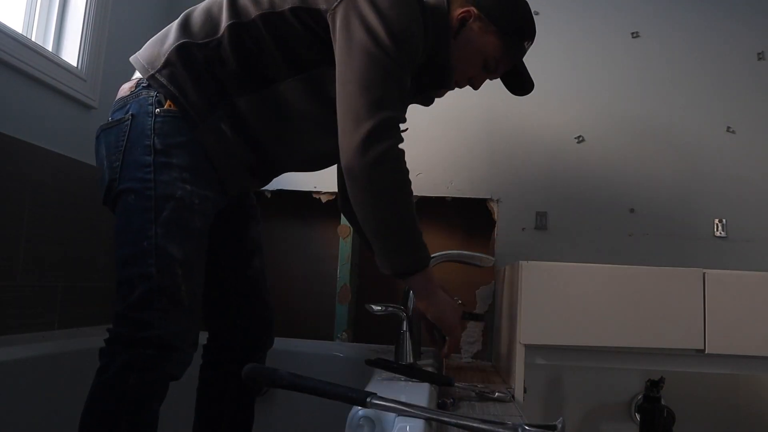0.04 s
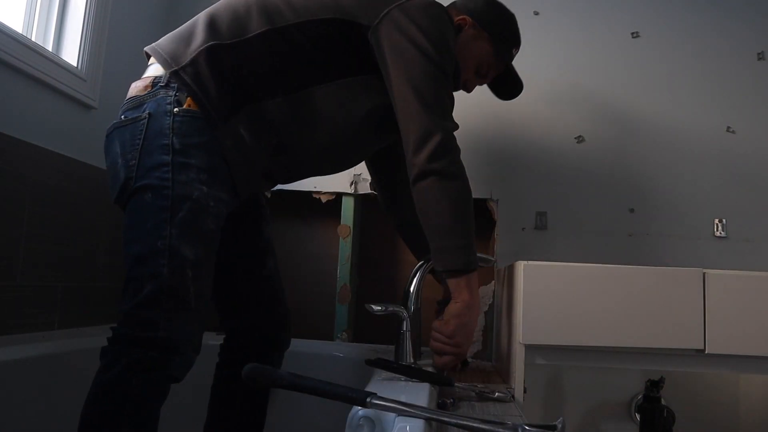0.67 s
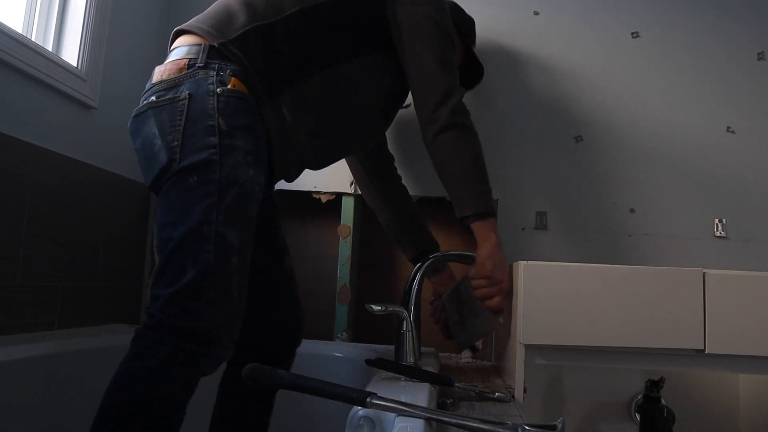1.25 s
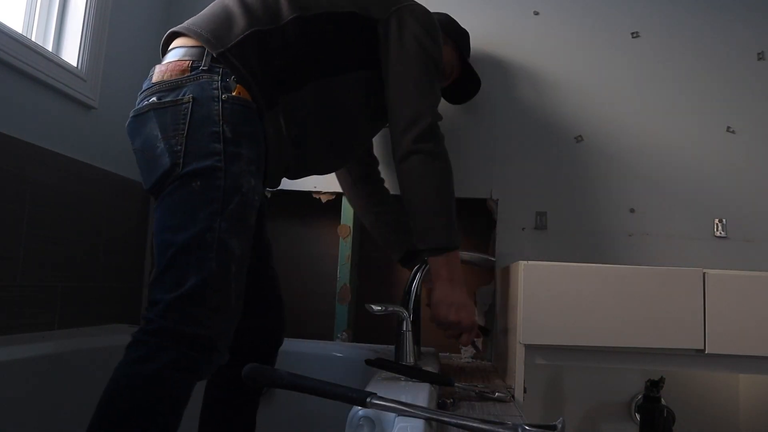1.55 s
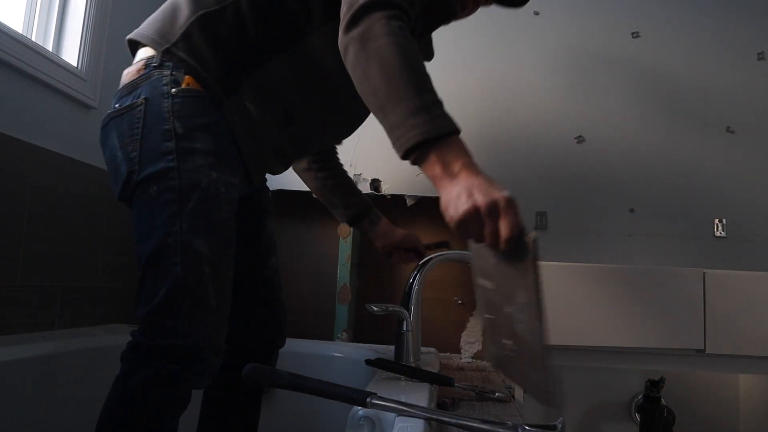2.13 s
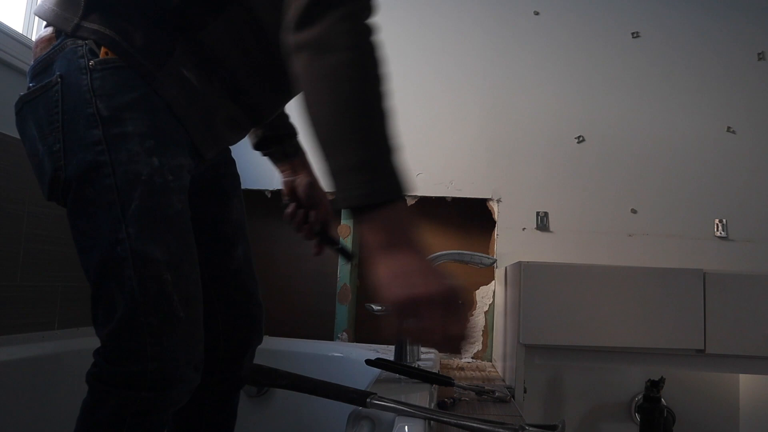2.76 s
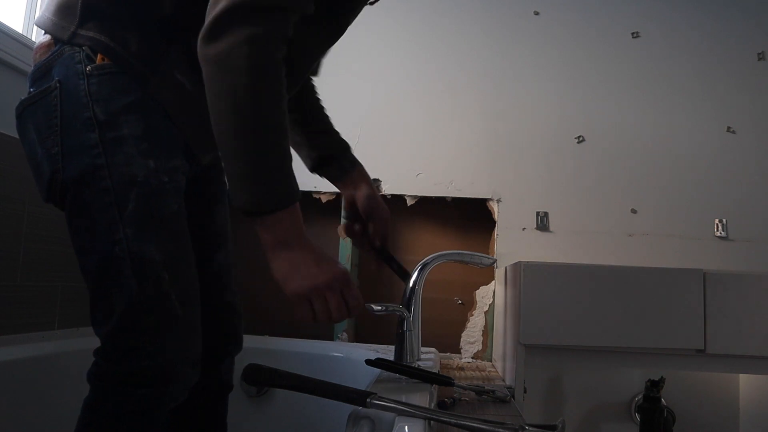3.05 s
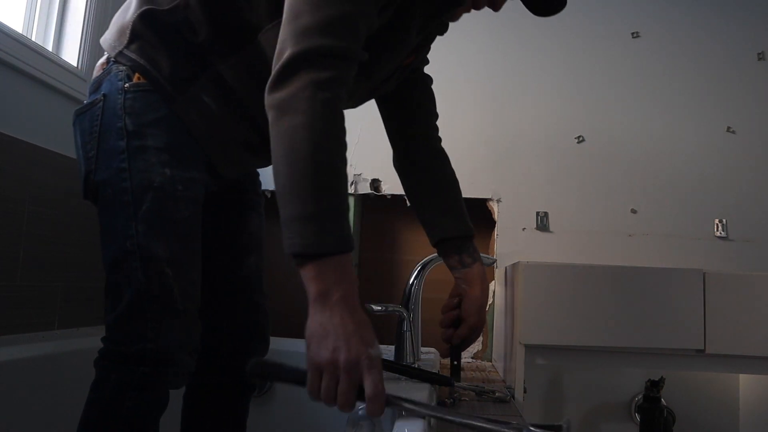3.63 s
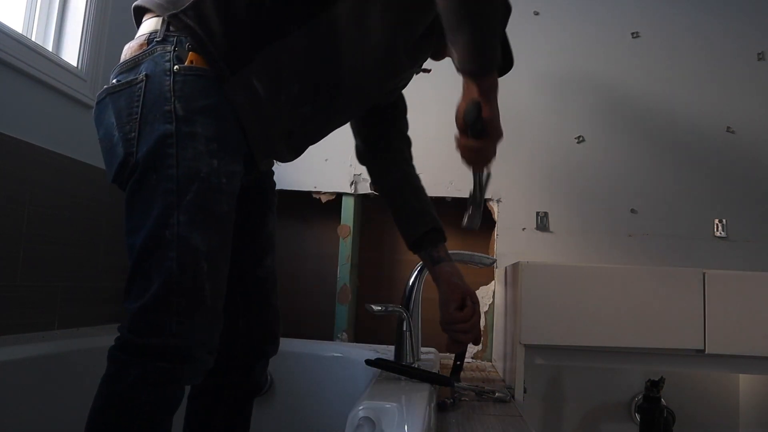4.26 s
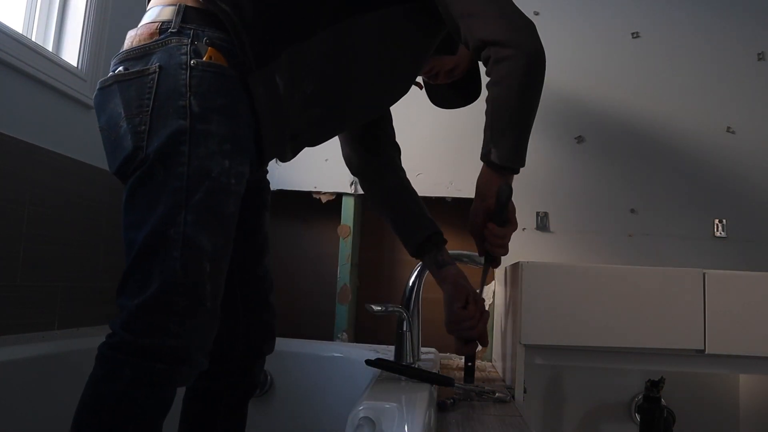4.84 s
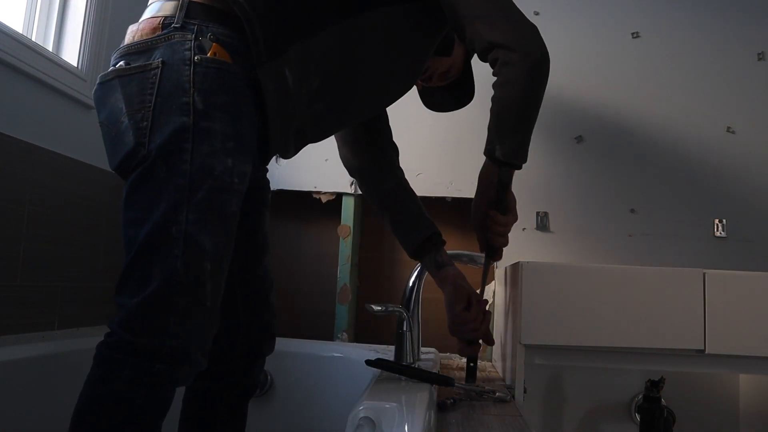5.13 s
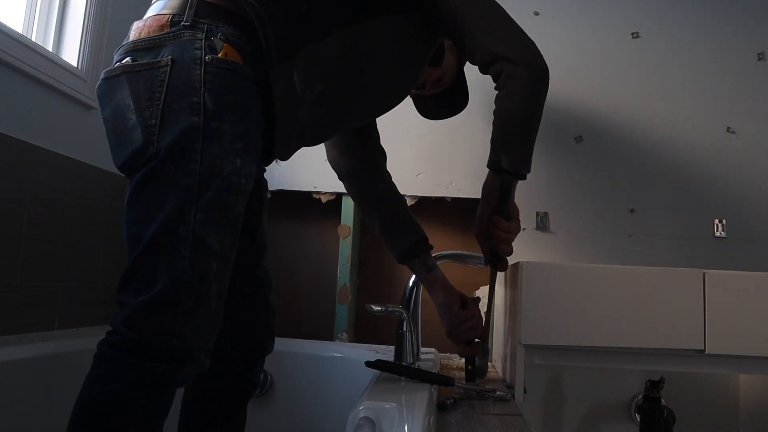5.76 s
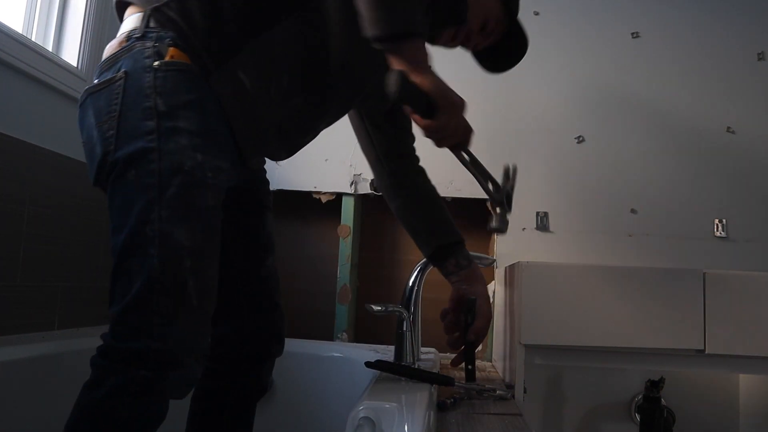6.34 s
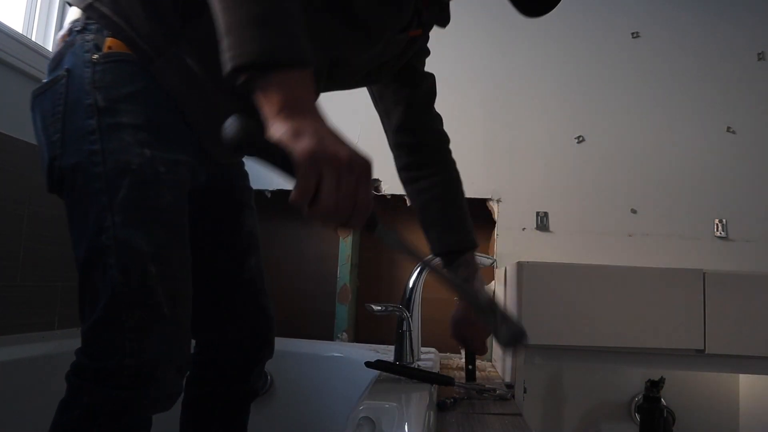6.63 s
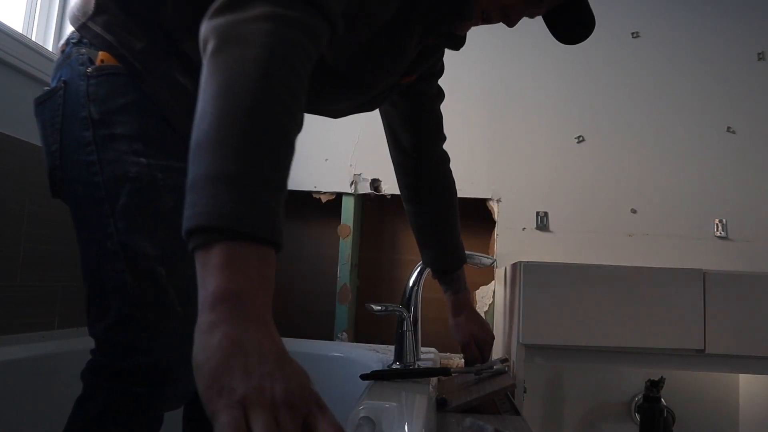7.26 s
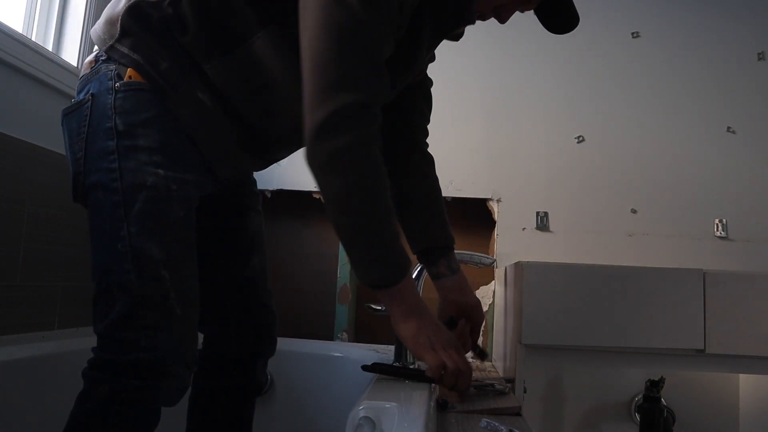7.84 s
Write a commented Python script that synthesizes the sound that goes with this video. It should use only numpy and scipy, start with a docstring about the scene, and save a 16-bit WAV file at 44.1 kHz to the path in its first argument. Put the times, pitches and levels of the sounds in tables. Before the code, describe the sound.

A steel bar works at wall tile close by in a bare, ringing bathroom, over faint room air and soft rustling. It starts with light metal tinks and a short scrape. From about 0.6 to 1.6 seconds the bar grinds and chips through mortar, with falling crumbs, hollow knocks and a low rumble from wall and tub. At 2 seconds a tile snaps free with a loud thump and a few dry knocks. From 2.8 to 3.3 seconds it clatters and rings on the floor. Near 4.5 seconds a hammer hits the tub ledge with a ringing double knock, then dull bumps. It strikes the bar three times, sharp and metallic, at about 5.1, 5.4 and 5.8 seconds. Around 7 seconds more mortar scrapes and breaks and shards clack. From 7.4 seconds tools clink on the tub rim, the last ringing a clear note.

```python
"""A bare, ringing bathroom: tile is pried off the hollow wall beside the tub.
A steel bar grinds and chips through mortar until a tile snaps free. Tossed aside, the tile clatters
on the floor. A hammer knocks the ledge and drives the bar three times; more mortar breaks, then tools
rattle on the tub rim. Contacts are clicks and grit that shake the wall; struck objects ring in
decaying modes. Room air, soft swells of noise and a deep sway of tub and wall lie underneath."""
import sys
import numpy as np
from scipy import signal
from scipy.fft import rfft, irfft
from scipy.io import wavfile
from scipy.ndimage import uniform_filter1d

SR = 44100
rng = np.random.default_rng(int(sys.argv[2]) if len(sys.argv) > 2 else 0)


def to_wav(sig):
    """Store sig (one row per channel, or 1-D mono) as 16-bit WAV at the path in sys.argv[1].

    Samples outside -1..1 are clipped; the rate is SR.
    """
    pcm = np.clip(np.atleast_2d(sig), -1, 1) * 32767
    pcm = np.round(pcm).astype(np.int16)
    wavfile.write(sys.argv[1], SR, pcm.T)  # frames by channels


N = 357210
SPAN = SR // 4   # samples per contact

# Room air spectrum. Each row: frequency in Hz, relative density in dB.
AIR_SPECTRUM = [(30, -11), (100, 4), (250, -4), (600, -15.5), (1500, -12.5), (4000, -29.5), (9000, -40),
                (12000, -29.5), (15000, -61.5)]
# Soft swells of noise. Each row: midpoint in seconds, length in seconds, level in dB.
SWELLS = [(0.175, 1, -40.5), (1.09, 0.76, -34.5), (1.631, 0.63, -43.5), (2.507, 0.44, -49),
          (2.76, 0.2, -46), (3.265, 1, -52.5), (3.792, 0.032, -33), (4.13, 0.064, -63),
          (4.303, 0.03, -58.5), (4.75, 0.17, -43), (6.68, 0.96, -66), (6.858, 0.026, -71)]
# Spectrum of the swells. Each row: frequency in Hz, relative density in dB.
SWELL_SPECTRUM = [(300, 3), (1000, 3.5), (3000, -1), (7000, -11.5), (12000, -13), (14000, -27),
                  (15500, -30)]
# Weight shifts. Each row: start in seconds, level in dB.
WEIGHT_SHIFTS = [(.9, -52), (1.18, -31), (1.45, -22), (2.828, -64), (4.45, -52)]
# Hollow stud wall and tub. Each row: frequency in Hz, level in dB, T60 in seconds.
HOLLOW_WALL_MODES = [(72, -11, .09), (88, -3, .08), (106, -1, .065), (135, -1, .09), (172, -3, .04),
                     (219, 3, .075), (252, 1, .06), (315, -1, .035), (400, -1, .04), (480, -3, .025),
                     (700, -7, .015)]
# Grazes on the loosely held bar. Each row: start in seconds, ring in dB, clack in dB.
BAR_TINKS = [(.001, -40, -35), (.313, -38, -32), (2.467, -50, -58), (2.545, -53.5, -53.5)]
# Free bar. Each row: frequency in Hz, level in dB, T60 in seconds.
LOOSE_BAR_MODES = [(1480, -2, .6), (1513, -1, .4), (2912, -9, .35), (3661, -8, .3), (3685, -10, .15),
                   (4710, -20, .35), (7063, -14, .38), (8570, -15, .32), (10700, -9, .18)]
# Crumbs of glaze and mortar. Each row: start in seconds, level in dB, band centre in Hz.
CRUMB_FALLS = [(.052, -53.5, 11900), (.183, -47, 10500), (1.186, -45, 10500), (1.207, -41, 11000),
               (1.264, -49, 9000), (3.14, -55, 12500), (3.231, -49, 12000), (3.564, -55, 4850),
               (4.756, -50.5, 4840)]
# Bar strokes through mortar. Each row: start and length in seconds, then thump, clack and crack in dB.
GRIND_STROKES = [(0.111, .11, -29.5, -28.5, -50), (0.889, 0.072, -27.5, -32, -41),
                 (0.919, 0.036, -17.5, -22.5, -60), (1.135, 0.11, -22, -23.5, -35.5),
                 (1.225, 0.098, -26, -28, -38), (6.928, 0.041, -49, -34, -44.5),
                 (6.99, 0.11, -35.5, -23.5, -51), (7.344, 0.062, -40.5, -38.5, -71)]
# Mortar chipping off. Each row: start in seconds, then thump, clack and crack in dB.
MORTAR_CHIPS = [(.168, -31, -50, -39), (0.642, -45, -45.5, -40), (0.977, -35, -37, -36.5),
                (1.131, -39.5, -37.5, -33.5), (2.073, -30, -30, -42), (2.086, -29, -29.5, -40.5),
                (3.795, -41, -47, -47), (6.035, -43.5, -38, -44.5), (6.576, -40.5, -53, -55),
                (7.105, -30, -29, -39.5)]
# Bar wedged behind a tile. Each row: frequency in Hz, level in dB, T60 in seconds.
WEDGED_BAR_MODES = [(1550, -2, .03), (1950, 0, .03), (2500, -1, .025), (2850, 1, .03), (3849, -4, .03),
                    (3960, 0, .02), (4110, 1, .02), (5184, -9, .03), (6406, -15, .04), (8000, -8, .03),
                    (8199, -10, .04), (10940, -16, .04), (12350, -13, .04)]
# Dull knocks on wall and tub. Each row: start in seconds, thump in dB, thump tilt in dB per octave,
# clack in dB, crumble time in seconds.
WALL_KNOCKS = [(.56, -42.5, 4, -52, .01), (0.778, -35, 3, -43, 0.01), (1.472, -25.5, -6, -59, 0.0036),
               (1.539, -44.5, 5, -18.5, 0.0023), (1.572, -30.5, 2, -29, 0.0025),
               (1.992, -24, 3, -26.5, 0.012), (2.155, -35, -1, -43, .01), (2.215, -34, -7.5, -42.5, .012),
               (2.29, -44.5, -7, -49, .01), (2.667, -46, -9, -64.5, .01), (2.74, -46.5, -6, -51.5, .01),
               (3.12, -24, 4, -39, .01), (4.59, -26, 5, -33.5, 0.014), (4.62, -31, 7.5, -35.5, 0.01),
               (6.419, -51.5, -4, -75, 0.016), (6.539, -44, 0, -77, 0.02), (6.895, -46.5, -0.5, -72, .02)]
# Bar edge on glaze. Each row: start in seconds, length in seconds, band centre in Hz, level in dB.
GLAZE_SQUEAKS = [(1.256, 0.02, 2780, -33.5), (4.754, .022, 4070, -55), (6.03, 0.024, 1960, -42.5),
                 (6.926, 0.03, 1950, -42.5)]
# Freed tile and backing against the wall. Each row: start in seconds, level in dB.
SLAB_KNOCKS = [(1.958, -24), (1.992, -22), (2.052, -30.5), (2.085, -31)]
# Hand-held tile backed with mortar. Each row: frequency in Hz, level in dB, T60 in seconds.
HELD_SLAB_MODES = [(273, -2.5, .07), (326, -1, .06), (379, 1, .08), (425, 2, 0.056), (484, -2, .05),
                   (558, -3, .04)]
# Tossed tile bouncing. Each row: start in seconds, clack in dB, crack in dB, crumble time in seconds.
TILE_BOUNCES = [(2.8445, -22, -32.5, 0.0054), (2.8559, -17, -22, 0.001), (2.87, -33.5, -33.5, 0.015),
                (2.978, -21, -44, 0.011), (3.022, -25, -51.5, 0.013), (3.079, -20, -44, 0.05),
                (3.116, -22, -29.5, 0.0059), (3.15, -22, -50.5, 0.007), (3.19, -28.5, -60, .008),
                (3.235, -26.5, -51, 0.017)]
# Whole tile, free. Each row: frequency in Hz, level in dB, T60 in seconds.
FREE_TILE_MODES = [(1110, -4, .12), (1254, -8, .15), (1390, -2, .18), (1523, 6, .55), (1537, 1, .35),
                   (1564, 4, .38), (1650, -5, .15), (1841, -10, .15), (1985, -6, .15), (2153, -4, .33),
                   (2191, -7, .5), (2720, -9, .15), (2853, -9, .2), (2923, -8, .35), (2960, -3, .2),
                   (3040, -7, .15), (3521, -15, .45), (3610, -14, .15), (5410, -25, .3), (7154, -28, .45)]
# Shards and tools on the ledge. Each row: start in seconds, clack in dB.
SHARD_CLACKS = [(3.739, -34.5), (3.8626, -35), (6.9554, -21), (7.386, -22.5), (7.5473, -28), (7.761, -31.5),
                (8.03, -43)]
# Shard damped by mortar. Each row: frequency in Hz, level in dB, T60 in seconds.
DAMPED_SHARD_MODES = [(540, -1.5, 0.017), (1155, 7, 0.0067), (1700, 7.5, 0.007), (2040, 2.5, 0.02),
                      (2600, -7.5, 0.017), (4500, -2.5, 0.0059)]
# Hammer knocking the ledge and dropping back. Each row: start in seconds, then thud, clack and ring
# in dB, ring tilt in dB per octave.
LEDGE_HITS = [(4.4452, -18.5, -25, -21.5, -1), (4.482, -20.5, -29, -21.5, -0.5)]
# Tub ledge. Each row: frequency in Hz, level in dB, T60 in seconds.
TUB_LEDGE_MODES = [(131.2, -2, .2), (169, -3, 0.049), (228.8, -0.5, 0.122), (264, -1, 0.15),
                   (336, -4.5, 0.064), (402, -5, 0.11), (495, -3, .07), (598, -7.5, 0.032)]
# Hammer against the ledge. Each row: frequency in Hz, level in dB, T60 in seconds.
HAMMER_HEAD_MODES = [(1480, 1, .06), (1615, 5, .2), (1647, 3, .4), (1690, 2, .12), (1745, 0, .1),
                     (1950, 3, .07), (2150, 3, .04), (2450, 3, .04), (2713, -4, .22), (3106, 2, .07),
                     (3365, -2, .08), (3720, -14, .55), (3745, -6, .15), (5222, -19, .3), (6056, -12, .31),
                     (6503, -9, .16), (7020, -18, .15), (7585, -24, .3), (7768, -21, .22), (7876, -19, .25),
                     (8048, -25, .3)]
# Hammer driving the bar. Each row: start in seconds, clack in dB, zing in dB, zing tilt in dB per
# octave, crack in dB, ring in dB, ring tilt in dB per octave.
BAR_BLOWS = [(5.0831, -37, -20.5, 1, -23.5, -40.5, 10), (5.4242, -34, -15, -1, -25, -26.5, 4.5),
             (5.7520, -34.5, -23.5, 19, -22, -24.5, -1)]
# Bar struck end-on, damped by hand and mortar. Each row: frequency in Hz, level in dB, T60 in seconds.
DRIVEN_BAR_MODES = [(2110, 2, .025), (2200, 0, .02), (2500, 0, .01), (2864, 1, .025), (2990, 3, .02),
                    (3120, 2, .015), (3500, 1, .008), (3908, -2, .02), (4200, 0, .012), (4600, 0, .012),
                    (5200, -2, .01), (5650, -3, .035), (7731, -7, .12), (7870, -6, .05), (8037, -8, .06),
                    (8285, -12, .1), (10430, -8, .03), (11100, -5, .04), (11800, -10, .05)]
# Steel on steel. Each row: frequency in Hz, level in dB, T60 in seconds.
STEEL_ZING_MODES = [(4240, -4.5, 0.003), (5710, -9, 0.0058), (7540, 0, 0.0084), (8020, 3, 0.0062),
                    (10000, -1, 0.0032), (11000, -6.5, 0.0065), (11540, -8, .008)]
# Tools laid on the tub rim and nudged. Each row: start in seconds, then clack, thump and ring in dB.
RIM_CLINKS = [(7.445, -29, -22.5, -31.5), (7.794, -30, -29.5, -34.5)]
# Steel hammer shaft. Each row: frequency in Hz, level in dB, T60 in seconds.
HAMMER_SHAFT_MODES = [(4285, -8, .3), (4450, -3, .06), (4760, 1, .05), (4850, -1, .08), (6000, -5, .07),
                      (6300, -4, .07), (7058, -9, .25), (7130, -4, .08), (7700, -7, .08), (8113, -10, .16),
                      (8786, -9, .19), (9652, -11, .15), (11100, -9, .08)]
# Steel tool swinging free. Each row: frequency in Hz, level in dB, T60 in seconds.
LOOSE_TOOL_MODES = [(1701, -9, .5), (2756, 8, .6), (2778, -4, .35), (2810, -5, .15), (3391, -7, .3),
                    (4834, -19, .4), (5889, -15, .2), (7095, -22, .4), (8710, -18, .2)]
# Room decay. Each row: frequency in Hz, T60 in seconds.
ROOM_DECAY = [(60, 1), (150, 0.38), (300, 0.55), (600, 0.92), (1500, 0.82), (3000, 0.63), (5000, 0.81),
              (8000, 0.25), (14000, 0.44)]
# Diffuse field width. Each row: frequency in Hz, side minus mid in dB.
STEREO_WIDTH = [(60, -41.5), (125, -26), (250, -19.5), (500, -11), (1000, -2.5), (2000, 2), (4000, 4.5),
                (12000, 9.5)]


def from_db(db):
    """Decibels to gain."""
    return 10 ** (np.asarray(db) / 20)


def at_hz(points, hz):
    """Table lookup on a log-frequency axis."""
    points_hz, values = np.transpose(points)
    return np.interp(np.log(hz + 1), np.log(points_hz), values)


def unit(x):
    """Scale to the energy of 0.1 s at rms 1."""
    return x * np.sqrt(SR / 10 / (np.sum(x ** 2) + 1e-20))


def cut(x, hz, kind, order=2):
    """Butterworth filter."""
    sos = signal.butter(order, np.clip(hz, 10, .48 * SR), kind, fs=SR, output="sos")
    return signal.sosfilt(sos, x + 1e-18)


def add(track, start_s, x):
    """Mix x into the track."""
    i = max(0, round(start_s * SR))
    track[..., i:i + x.shape[-1]] += x[..., :N - i]


def tilted(modes, db_per_oct):
    """The strike point favours high or low modes."""
    return [(hz, db + db_per_oct * np.log2(hz / modes[0][0]), t60_s) for hz, db, t60_s in modes]


def detuned(modes, spread):
    """Pitches shift slightly with the contact point."""
    return [(hz * np.exp(spread * rng.standard_normal()), db, t60_s) for hz, db, t60_s in modes]


def ringing(modes, vary_db, size):
    """Decaying sines of alternating sign; their balance varies per touch."""
    t = np.arange(size) / SR
    hz, db, t60_s = np.transpose(modes)[:, :, None]
    gains = from_db(db + vary_db * rng.standard_normal(hz.shape))
    gains[1::2] *= -1
    decay = np.exp(-np.log(1000) * t / t60_s)
    return unit(np.sum(gains * decay * np.sin(2 * np.pi * hz * t), axis=0))


def diffuse(size):
    """Stereo noise from all sides: narrow bass, wide treble."""
    mid, side = rfft(rng.standard_normal((2, size)))
    width = from_db(at_hz(STEREO_WIDTH, np.arange(len(mid)) * SR / size))
    return irfft(np.array([mid + width * side, mid - width * side]) / np.sqrt(1 + width ** 2), size)


def coloured(spectrum):
    """Shaped diffuse noise, rms 1."""
    hz = np.arange(N // 2 + 1) * SR / N
    noise = irfft(rfft(diffuse(N)) * from_db(at_hz(spectrum, hz)), N)
    return noise / noise.std()


def room_air(level_db=-56):
    """Faint steady noise, mostly low."""
    return from_db(level_db) * coloured(AIR_SPECTRUM)


def noise_swells(rest_db=-64.5, flutter_db=2):
    """Soft swells of noise: room wash, cloth rustle and small scrapes."""
    t = np.arange(N) / SR
    flutter = cut(rng.standard_normal(N), 40, "low")
    swells = sum(from_db(db) * np.cos(np.pi * np.clip((t - middle_s) / length_s, -.5, .5))
                 for middle_s, length_s, db in SWELLS)
    level = (from_db(rest_db) + swells) * from_db(flutter_db * flutter / flutter.std())
    return level * coloured(SWELL_SPECTRUM)


def swaying(rest_db=-68.5, attack_s=.017, t60_s=.48):
    """Each weight shift sets tub and wall rumbling."""
    level = from_db(rest_db)
    for start_s, db in WEIGHT_SHIFTS:
        age_s = np.maximum(np.arange(N) / SR - start_s, 0)
        level = level + from_db(db - 60 * age_s / t60_s) * (1 - np.exp(-age_s / attack_s))
    rumble = cut(rng.standard_normal(N), [24, 52], "band")
    return level * rumble / rumble.std()


def grit(grains_per_s=2500, spread_db=2):
    """Mortar grains crack at random, a few much harder."""
    sizes = from_db(spread_db * np.minimum(rng.exponential(1, SPAN), 4)) * rng.standard_normal(SPAN)
    return sizes * (rng.random(SPAN) < grains_per_s / SR)


def tiled_wall(push, force, thump_db, clack_db, clack_hz, crack_db, crack_hz, wall_db_per_oct):
    """Push thumps the hollow wall; force clacks the damped tile and cracks its brittle edge."""
    modes = tilted(detuned(HOLLOW_WALL_MODES, spread=.051), wall_db_per_oct)
    thump = signal.fftconvolve(push, ringing(modes, vary_db=2.96, size=SPAN))[:SPAN]
    thump = cut(thump, 50, "high", order=3)
    clack = cut(force, clack_hz * .33, "high", order=1)
    clack = cut(clack, clack_hz * 1.632, "low", order=3)
    clack = cut(clack, 300, "high")
    crack = cut(force, [crack_hz * .35, crack_hz * 1.52], "band", order=1)
    crack = cut(crack, 11430, "low", order=10)
    clatter = from_db(clack_db) * unit(clack) + from_db(crack_db) * unit(crack)
    return from_db(thump_db) * unit(thump), clatter


def contact(start_s, thump_db, clack_db, crack_db, clack_hz, crack_hz, crumble_s, direct_db,
            thump_direct_db=-10, grains_per_s=2500, wall_db_per_oct=0):
    """A click and a spill of grit; the wall feels mostly the click. Rows: direct, room send."""
    out, t = np.zeros((2, N)), np.arange(SPAN) / SR
    click = unit(signal.unit_impulse(SPAN))
    spill = unit(grit(grains_per_s) * np.exp(-t / crumble_s))
    push = click + from_db(-12) * spill
    force = click + spill * crumble_s / .0021
    thump, clatter = tiled_wall(push, force, thump_db, clack_db, clack_hz, crack_db, crack_hz,
                                wall_db_per_oct)
    add(out, start_s, np.outer(from_db([direct_db, 0]), clatter))
    add(out, start_s, np.outer(from_db([thump_direct_db, -3]), thump))
    return out


def ring(start_s, modes, db, room_db, db_per_oct=0):
    """A touched object rings on. Rows: direct, room send."""
    out = np.zeros((2, N))
    tone = ringing(tilted(modes, db_per_oct), vary_db=1, size=SR * 3 // 4)
    add(out, start_s, np.outer(from_db([db, db + room_db]), tone))
    return out


def bar_tinks():
    """A light touch rings the free bar."""
    out = np.zeros((2, N))
    for start_s, ring_db, clack_db in BAR_TINKS:
        out += contact(start_s, clack_db - .5, clack_db, clack_db - 24.5,
                       clack_hz=900, crack_hz=5000, crumble_s=.0042, direct_db=-4.5)
        out += ring(start_s, LOOSE_BAR_MODES, ring_db, room_db=-3.5, db_per_oct=-2)
    return out


def crumbs(skitter_s=.01, half_width=.24):
    """Fragments tick a few times, too light to stir the wall."""
    out, t = np.zeros((2, N)), np.arange(SPAN) / SR
    for start_s, db, hz in CRUMB_FALLS:
        grains = grit(grains_per_s=1200) * np.exp(-t / skitter_s)
        ticks = cut(grains, [hz * (1 - half_width), hz * (1 + half_width)], "band", order=1)
        add(out, start_s, np.outer(from_db([db - 1, db]), unit(ticks)))
    return out


def grinding(slips_per_s=110, jitter=.45):
    """The bar sticks and slips unevenly, crushing grit."""
    out, t = np.zeros((2, N)), np.arange(SPAN) / SR
    for start_s, length_s, thump_db, clack_db, crack_db in GRIND_STROKES:
        wander = np.repeat(rng.standard_normal(SPAN), SR // 100)[:SPAN]   # 10 ms steps
        slip_count = np.cumsum(slips_per_s * np.exp(jitter * wander)) / SR
        slips = np.diff(np.floor(slip_count), prepend=0)
        pressure = np.sin(np.pi * np.minimum(t / length_s, 1))
        force = pressure * (unit(slips) + unit(grit()))
        thump, clatter = tiled_wall(force, force, thump_db, clack_db, clack_hz=1270,
                                    crack_db=crack_db, crack_hz=5400, wall_db_per_oct=1.8)
        add(out, start_s, np.outer(from_db([-1.2, -1.5]), thump + clatter))
    return out


def chipping():
    """Brittle mortar gives way; the wedged bar hardly rings."""
    out = np.zeros((2, N))
    for start_s, thump_db, clack_db, crack_db in MORTAR_CHIPS:
        out += contact(start_s, thump_db, clack_db, crack_db,
                       clack_hz=1710, crack_hz=4530, crumble_s=.0054, direct_db=-5.5)
        out += ring(start_s, WEDGED_BAR_MODES, clack_db - 32.5, room_db=-5)
    return out


def knocking():
    """Blunt contacts: low, almost no crack."""
    return sum(contact(start_s, thump_db, clack_db, clack_db - 56, clack_hz=670, crack_hz=4470,
                       crumble_s=crumble_s, direct_db=-6, wall_db_per_oct=db_per_oct)
               for start_s, thump_db, db_per_oct, clack_db, crumble_s in WALL_KNOCKS)


def squeaks(half_width=.064):
    """The bar's edge rubs the glaze: a short, rough whistle."""
    out, t = np.zeros((2, N)), np.arange(SPAN) / SR
    for start_s, length_s, hz, db in GLAZE_SQUEAKS:
        whistle = cut(rng.standard_normal(SPAN), [hz * (1 - half_width), hz * (1 + half_width)], "band")
        pressure = np.sin(np.pi * np.minimum(t / length_s, 1))
        add(out, start_s, from_db(db) * unit(whistle * pressure))
    return out


def snap(start_s=1.956):
    """The tile cracks free; the wall springs back and the bar rings briefly."""
    fracture = contact(start_s, thump_db=-12, clack_db=-22.5, crack_db=-30, clack_hz=705, crack_hz=3300,
                       crumble_s=.014, direct_db=1.5, thump_direct_db=-3, wall_db_per_oct=1.5)
    return fracture + ring(start_s, WEDGED_BAR_MODES, db=-23, room_db=1, db_per_oct=-3)


def slab():
    """The freed, mortar-backed tile knocks dryly on the wall."""
    return sum(ring(start_s, detuned(HELD_SLAB_MODES, spread=.025), db, room_db=-4)
               for start_s, db in SLAB_KNOCKS)


def tossed_tile(freeing_db_per_s=26, hiding_db_per_s=35):
    """The tile lands flat on grit, then rings more freely; direct sound fades as it skids from view."""
    out = np.zeros((2, N))
    for start_s, clack_db, crack_db, crumble_s in TILE_BOUNCES:
        age_s = start_s - TILE_BOUNCES[0][0]
        out += contact(start_s, clack_db - 13.5, clack_db, crack_db, clack_hz=1400, crack_hz=3170,
                       crumble_s=crumble_s, direct_db=1 - hiding_db_per_s * age_s, grains_per_s=1700)
        ring_db = clack_db - 11.5 + freeing_db_per_s * age_s
        out += ring(start_s, detuned(FREE_TILE_MODES, spread=.0015), ring_db, room_db=5.5)
    return out


def shards(hard_clack_db=-14, bite_db_per_db=.96):
    """Dry clacks; harder ones carry more crack and ring."""
    out = np.zeros((2, N))
    for start_s, clack_db in SHARD_CLACKS:
        bite_db = clack_db + bite_db_per_db * (clack_db - hard_clack_db)
        out += contact(start_s, clack_db - 9, clack_db, bite_db - 6.5, clack_hz=1140, crack_hz=3020,
                       crumble_s=.00039, direct_db=-4.5, thump_direct_db=-14.5)
        out += ring(start_s, DAMPED_SHARD_MODES, bite_db + 9.5, room_db=-11)
    return out


def hammer_on_ledge(thump_db=-17.5, crack_db=-31.5):
    """The heavy head thuds on the ledge, shakes the wall and rings."""
    out = np.zeros((2, N))
    for start_s, thud_db, clack_db, ring_db, db_per_oct in LEDGE_HITS:
        out += contact(start_s, thump_db, clack_db, crack_db, clack_hz=764, crack_hz=2600,
                       crumble_s=.0023, direct_db=-15.5, wall_db_per_oct=5)
        out += ring(start_s, TUB_LEDGE_MODES, thud_db, room_db=.5)
        out += ring(start_s, HAMMER_HEAD_MODES, ring_db, room_db=-1, db_per_oct=db_per_oct)
    return out


def hammer_on_bar(thump_db=-20):
    """Blows pass through the bar into the wall; lower modes take over as the bar seats."""
    out = np.zeros((2, N))
    for start_s, clack_db, *_, ring_db, db_per_oct in BAR_BLOWS:
        out += contact(start_s, thump_db, clack_db, clack_db + 1.5, clack_hz=1140, crack_hz=2370,
                       crumble_s=.0015, direct_db=2, thump_direct_db=-11.5)
        out += ring(start_s, DRIVEN_BAR_MODES, ring_db, room_db=0, db_per_oct=db_per_oct)
    return out


def zings(lag_s=.0017, crack_s=.0012, echo_s=.0082, echo_db=-8.5):
    """The hammer face seats on the bar: steel zings, mortar cracks, the near wall echoes both."""
    out, t = np.zeros((2, N)), np.arange(SPAN) / SR
    for start_s, _, zing_db, db_per_oct, crack_db, *_ in BAR_BLOWS:
        burst = rng.standard_normal(SPAN) * np.exp(-t / crack_s)
        crack = cut(burst, 1700, "high", order=1)
        crack = unit(cut(crack, 7000, "low", order=1))
        zing = ringing(tilted(STEEL_ZING_MODES, db_per_oct), vary_db=2, size=SPAN)
        strike = cut(from_db(zing_db) * zing + from_db(crack_db) * crack, 12700, "low", order=8)
        add(out, start_s + lag_s, np.outer(from_db([.5, -.5]), strike))
        add(out[0], start_s + lag_s + echo_s, from_db(echo_db) * strike)
    return out


def loose_tools(swing_start_s=7.818):
    """Tools rattle on the rim; the last swings free and rings a clear note."""
    out = np.zeros((2, N))
    for start_s, clack_db, thump_db, ring_db in RIM_CLINKS:
        out += contact(start_s, thump_db, clack_db, clack_db + 1, clack_hz=1440, crack_hz=3170,
                       crumble_s=.01, direct_db=-6, thump_direct_db=-19, wall_db_per_oct=-.5)
        out += ring(start_s, HAMMER_SHAFT_MODES, ring_db, room_db=-1)
    return out + ring(swing_start_s, LOOSE_TOOL_MODES, db=-29.5, room_db=-3.5)


def from_the_right(x, knee_hz=1250, max_lag_rad=1.93):
    """Direct sound reaches the left later; the phase lag levels off in the treble."""
    hz = np.arange(N // 2 + 1) * SR / N
    lag_rad = max_lag_rad * np.tanh(hz / knee_hz)
    left = irfft(rfft(x) * np.exp(-1j * lag_rad), N)
    return np.array([left, x])


def evened(tail, narrow_bins=45, broad_bins=451):
    """Smooth the room response so no narrow band booms; keep the first second."""
    spectrum = rfft(tail)
    power = np.mean(np.abs(spectrum) ** 2, axis=0)
    narrow = np.abs(uniform_filter1d(power, narrow_bins)) + 1e-18
    broad = np.abs(uniform_filter1d(power, broad_bins)) + 1e-18
    return irfft(spectrum * np.sqrt(broad / narrow), tail.shape[1])[:, :SR]


def bathroom(x, build_s=.0044, early_db=3, early_s=.014):
    """Close, hard walls: dense early echoes, then a tail that dies sooner in the high treble."""
    size = SR * 3 // 2
    t, spectrum = np.arange(size) / SR, rfft(diffuse(size))
    hz = np.arange(spectrum.shape[1]) * SR / size
    centres_hz = np.geomspace(50, 15000, 14)
    tail = 0
    for centre_hz, share in zip(centres_hz, np.eye(len(centres_hz))):
        band = irfft(spectrum * at_hz(np.c_[centres_hz, share], hz), size)
        tail = tail + band * from_db(-60 * t / at_hz(ROOM_DECAY, centre_hz))
    build_up = 1 - np.exp(-(t / build_s) ** 2)
    early_boost = 1 + from_db(early_db) * np.exp(-t / early_s)
    tail = evened(tail * build_up * early_boost)
    tail /= np.sqrt(np.sum(tail ** 2) / 2)
    return signal.fftconvolve(x[None], tail, axes=1)[:, :N]


def scene():
    """The work, direct and through the room, over air, noise swells and sway."""
    direct, send = (grinding() + chipping() + knocking() + bar_tinks() + snap() + slab() + tossed_tile()
                    + hammer_on_ledge() + hammer_on_bar() + zings() + shards() + loose_tools()
                    + crumbs() + squeaks())
    work = from_the_right(direct) + from_db(-.5) * bathroom(send)
    return work + room_air() + noise_swells() + swaying()


def record(dry, ceiling=.9, cutoff_hz=15800):
    """Soft clip on the hardest peaks, then a steep low-pass."""
    clipped = dry / (1 + (dry / ceiling) ** 6) ** (1 / 6)
    low_pass = signal.ellip(10, .1, 90, cutoff_hz, fs=SR, output="sos")
    return signal.sosfilt(low_pass, .9 * clipped)


dry = scene()
out = record(dry)
to_wav(out)
```